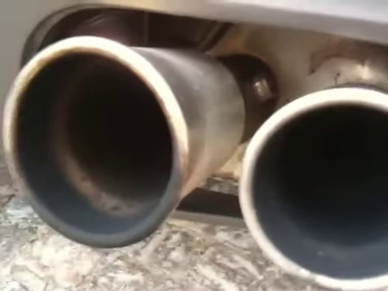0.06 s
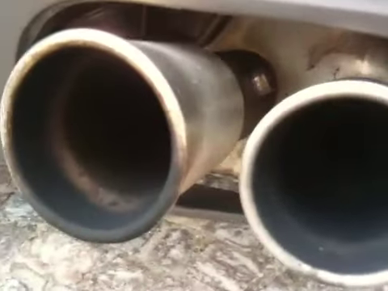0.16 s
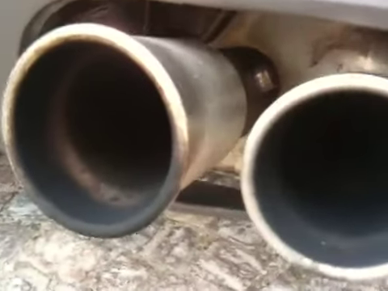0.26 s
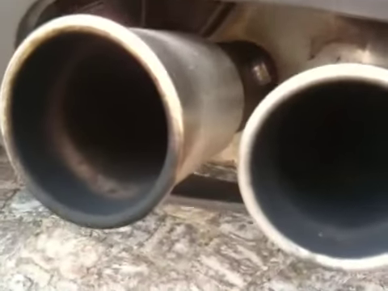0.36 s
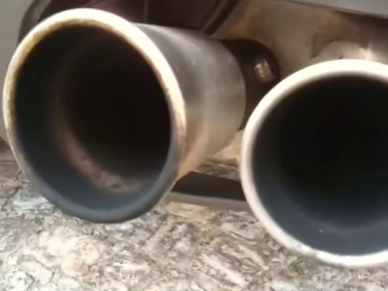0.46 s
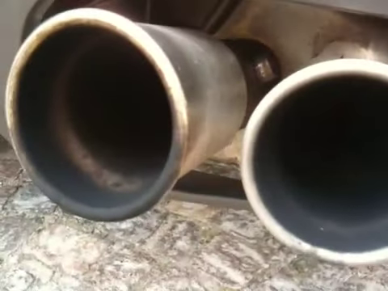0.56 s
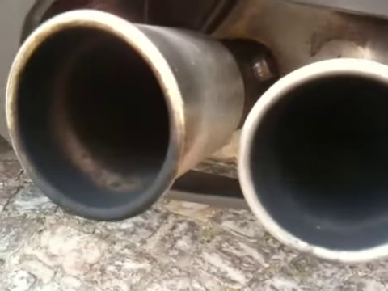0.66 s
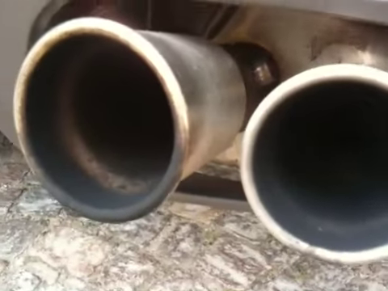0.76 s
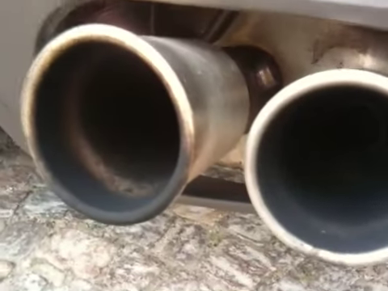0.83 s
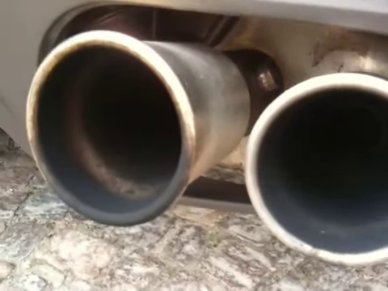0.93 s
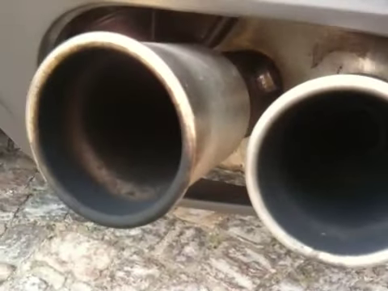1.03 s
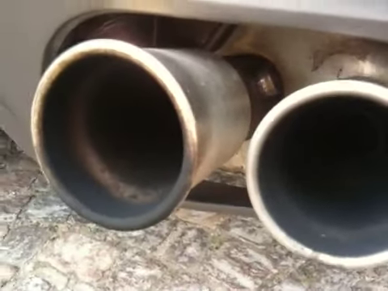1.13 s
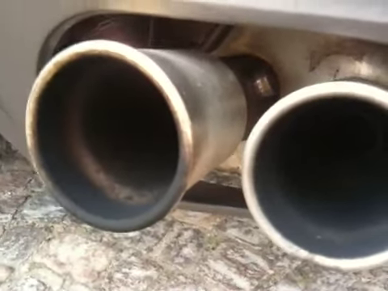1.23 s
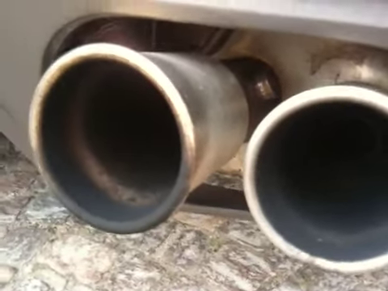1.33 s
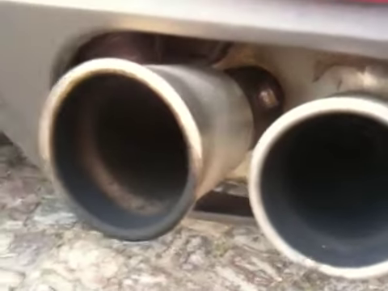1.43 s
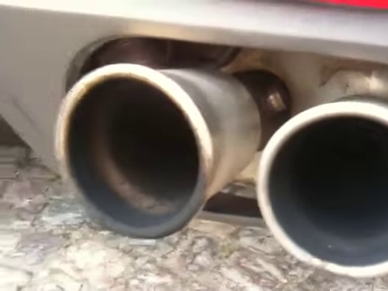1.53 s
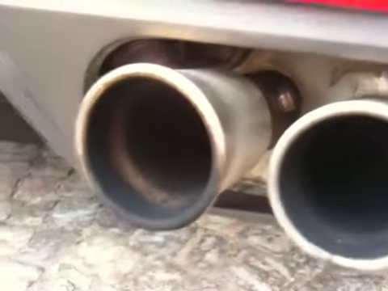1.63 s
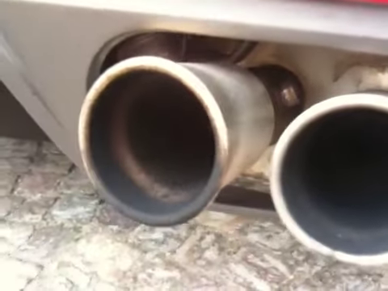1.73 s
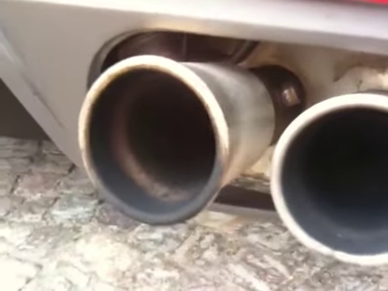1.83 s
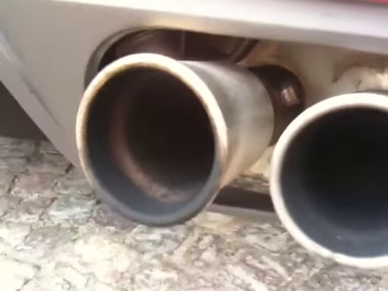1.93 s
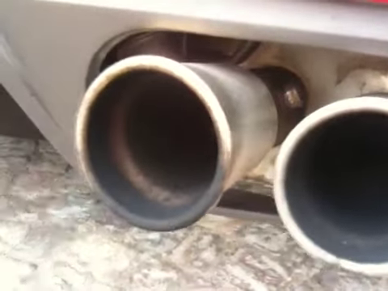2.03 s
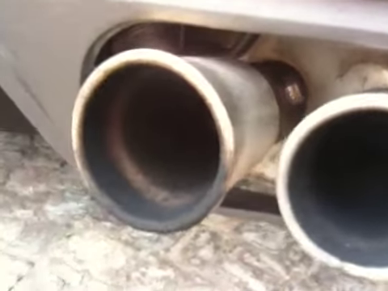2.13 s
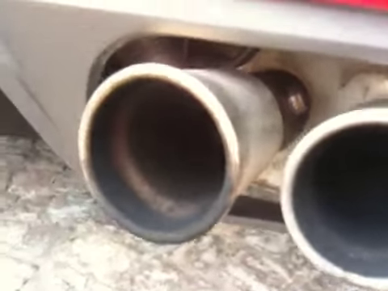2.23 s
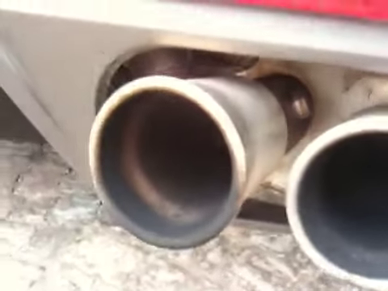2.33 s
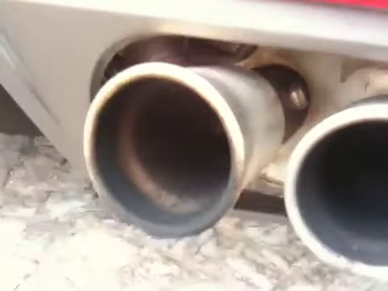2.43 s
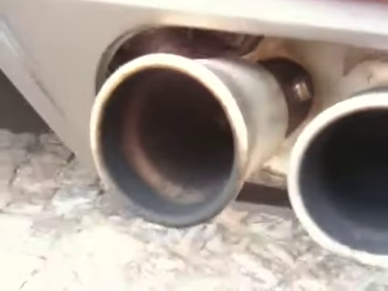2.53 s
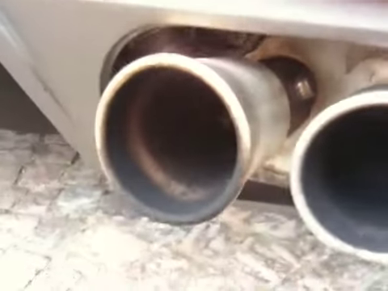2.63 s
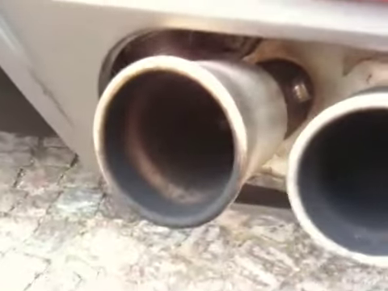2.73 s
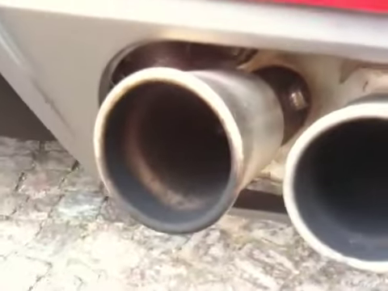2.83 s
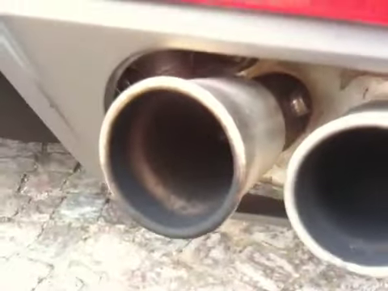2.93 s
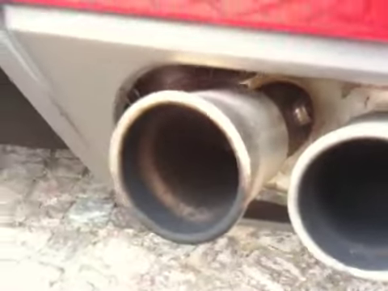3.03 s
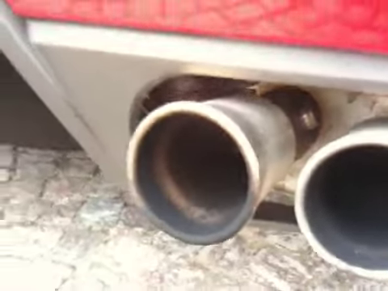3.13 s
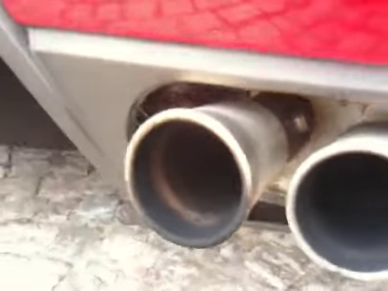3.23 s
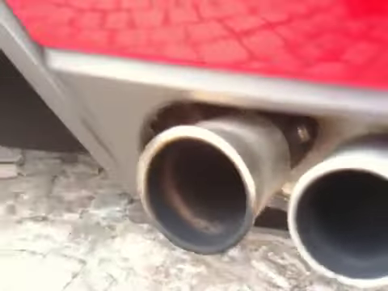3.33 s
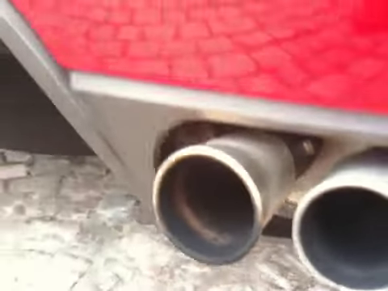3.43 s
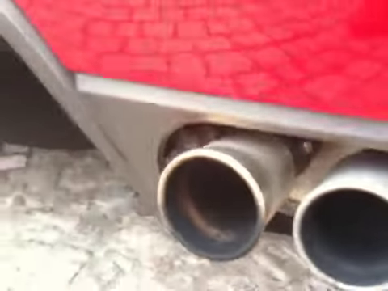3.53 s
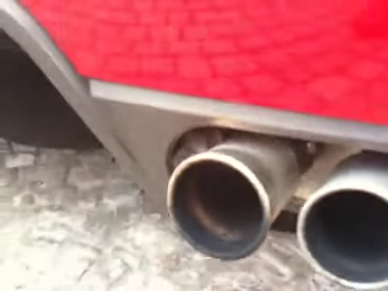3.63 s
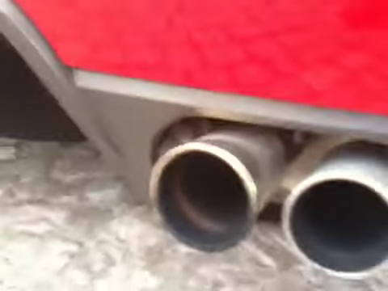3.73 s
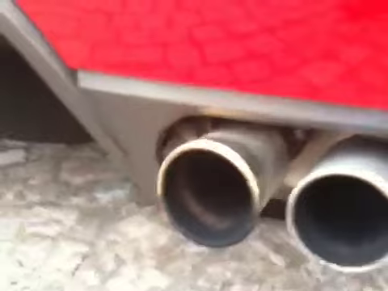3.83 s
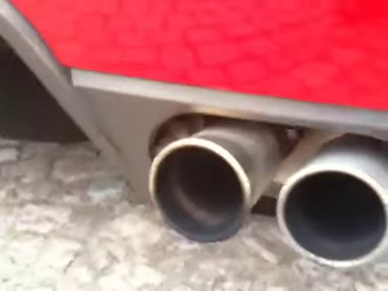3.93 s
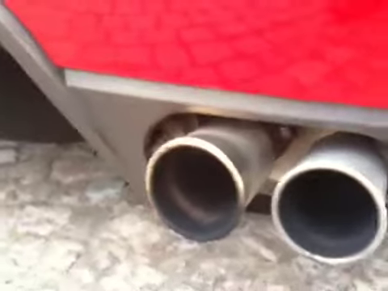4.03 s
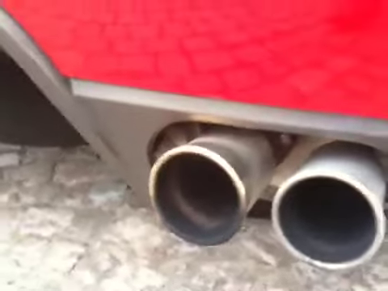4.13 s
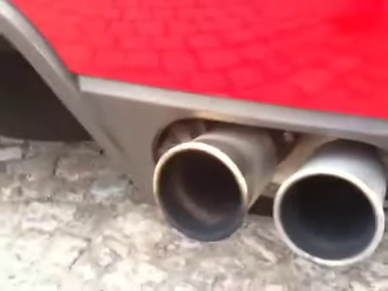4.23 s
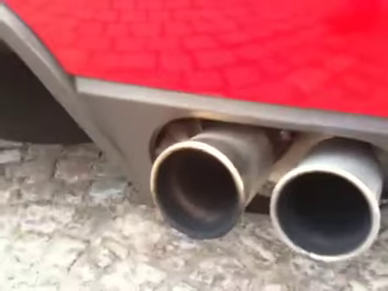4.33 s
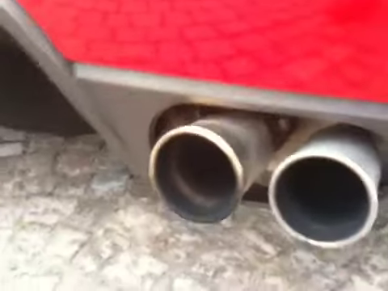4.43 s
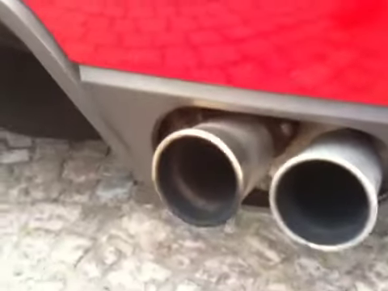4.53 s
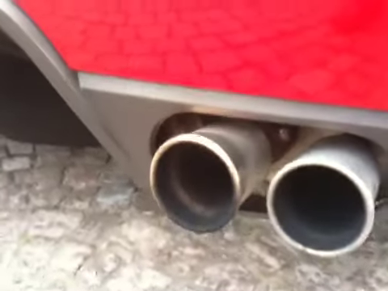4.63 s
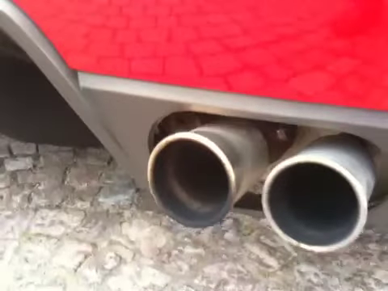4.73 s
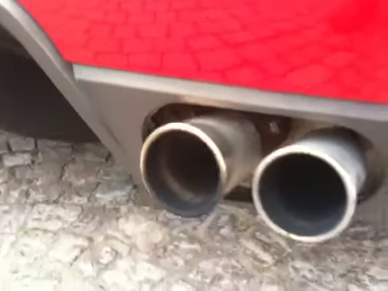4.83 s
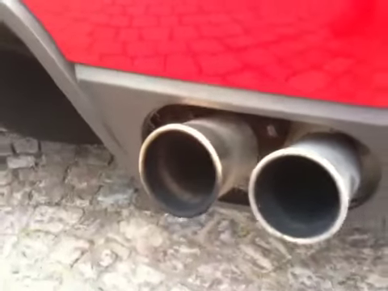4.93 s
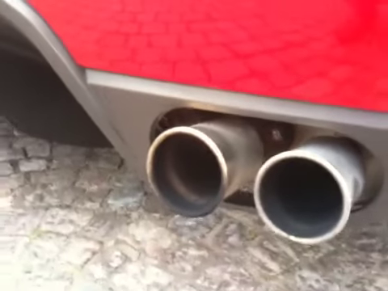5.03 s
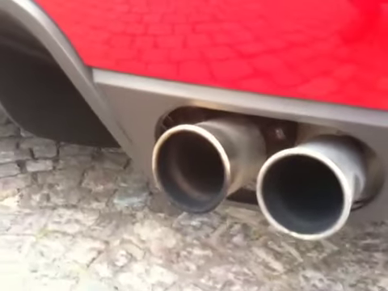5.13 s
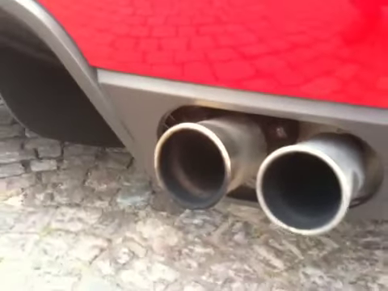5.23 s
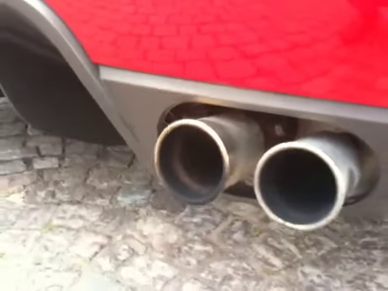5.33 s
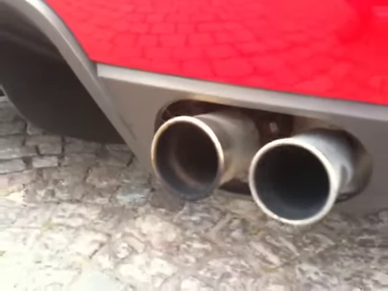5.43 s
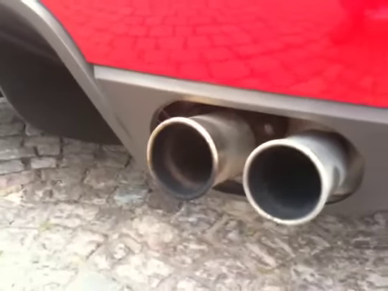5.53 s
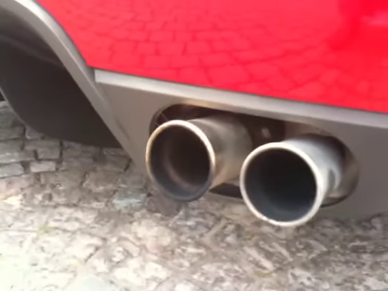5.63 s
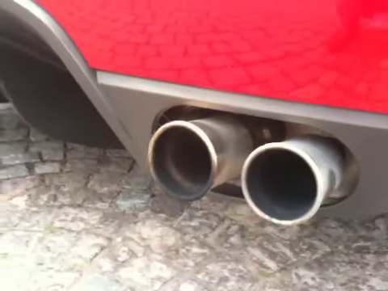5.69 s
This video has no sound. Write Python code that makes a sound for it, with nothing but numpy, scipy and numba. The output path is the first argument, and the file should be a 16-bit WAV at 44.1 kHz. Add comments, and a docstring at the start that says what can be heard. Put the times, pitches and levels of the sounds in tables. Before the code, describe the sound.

Nearly a second of very quiet outdoor wash, then a metallic clack and a pulsing electric gear whine with soft air puffs from the pipes. The exhaust suddenly erupts, holds a loud growl, drops into uneven thumps, then surges into a raspy, screaming blip before descending slowly with gurgling. One close microphone at the exhaust outlets outdoors; the sound is dry, compressed and slightly distorted.

```python
"""A paved street with low town noise, one microphone just behind the tailpipes of a V12 sports car.
The starter whines and whirrs, the engine catches, flares and sinks to a lumpy idle; one hard blip runs down
in a burble. Each firing rings the exhaust and pushes out turbulent gas, while single harmonics
howl as they sweep through its resonances. A limiter and an overloaded input flatten the loud parts."""
import sys
import numpy as np
from scipy import signal
from scipy.fft import rfft, irfft
from scipy.io import wavfile
from scipy.ndimage import uniform_filter1d
from numba import njit

SR = 44100
rng = np.random.default_rng(int(sys.argv[2]) if len(sys.argv) > 2 else 0)


def store_wav(level_fs):
    """Save 16-bit WAV to argv[1]."""
    pcm = np.round(np.clip(np.atleast_2d(level_fs), -1, 1) * 32767)
    wavfile.write(sys.argv[1], SR, pcm.T.astype(np.int16))


N = 254016
TIME = np.arange(N) / SR  # s
FREQS = np.maximum(np.arange(N + 1) * SR / (2 * N), 1)  # Hz, for a double-length spectrum

# Street: spectrum of the town noise [pitch_hz, level_db]
STREET_COLOUR = [(30, -52), (100, -11.5), (250, -2.5), (450, -7.5), (800, -7.5), (1900, -14.5), (2800, -26),
                 (6200, -35.5), (15000, -51)]
# Faint ticks in the street [start_s, level_db]
TICKS = [(0.5744, -50), (0.6094, -58), (0.6994, -62)]
# Town noise: level at the start, and its slope until the starter covers it
STREET_DB, STREET_DB_PER_S = -46.5, -7

# Starter: switched on, let go, and the decay of its whine
STARTER_ON_S, STARTER_OFF_S, STARTER_RELEASE_S = 0.9, 2.01, 0.027
# Rate at which its gear teeth mesh: at switch-on, at cranking speed, and the time constant between
MESH_START_HZ, MESH_HZ, SPIN_UP_S = 380, 1006, 0.27
WHINE_DB, WHINE_DB_PER_OCTAVE = -42, 24  # base level at cranking speed, slope with mesh rate
WHIRR_DB, WHIRR_ATTACK_S, WHIRR_RELEASE_S = -42, 0.016, 0.2  # the turning engine
# Partials of the gear whine [multiple_of_mesh_rate, level_db]
GEAR_PARTIALS = [(.27, -7), (1, .5), (2, 2), (3, -1.5), (4, -8)]
# Spectrum of the whirr [pitch_hz, level_db]
WHIRR_COLOUR = [(50, -54), (110, -13.5), (210, -10), (400, -17), (800, -4), (1200, -5.5), (2300, -9.5),
                (3200, -6.5), (5500, -13), (7000, -21), (10000, -24.5), (15000, -40)]
# The starter pinion snaps in [start_s, level_db, decay_s]
CLACKS = [(0.909, -33.5, 0.037), (0.932, -34.5, 0.029)]
# Spectrum of that snap [pitch_hz, level_db]
CLACK_COLOUR = [(47, -39), (80, -23), (229, 8.5), (613, -11), (684, -15), (797, 2), (930, -18), (1010, -12),
                (1470, 0), (2660, -8), (3780, -7), (8300, -10), (15000, -28)]
# Unfired air puffs and whistles out of the pipes [centre_s, pitch_hz, level_db]
AIR_PUFFS = [(1.085, 80, -52), (1.181, 1137, -36), (1.295, 100.5, -51), (1.458, 80, -51), (1.588, 105, -48),
             (1.745, 79.6, -52), (1.883, 106, -47), (2.041, 81, -51.5)]

# Engine speed, as firings of one six-cylinder bank [time_s, bank_hz]
SPEED = [(2.09, 25.11), (2.402, 65.65), (2.568, 65.43), (2.785, 58.6), (3.002, 41.9), (3.198, 29.66),
         (3.29, 29.18), (3.425, 44.35), (3.518, 63.58), (3.742, 150.2), (3.801, 163.6), (3.886, 165.4),
         (4.215, 152.5), (4.43, 140.3), (4.607, 127.0), (4.85, 104.9), (5.325, 73.85), (5.592, 50.35),
         (5.76, 37.68)]
# How hard the engine burns, about 0 throttle shut, 1 wide open [time_s, load]
LOAD = [(2.14, 0.79), (2.31, 0.95), (2.68, 0.89), (2.74, 0.7), (2.89, 0.7), (2.94, -0.068), (3.1, 0.56),
        (3.31, 0.13), (3.5, 0.9), (3.66, 0.81), (3.76, 1.21), (3.84, 0.93), (3.92, 0.51), (4.15, .25),
        (4.38, 0.44), (5.35, 0.35), (5.5, -0.23), (5.76, 0.13)]
# Unevenness of combustion at each engine speed [bank_hz, scatter_db]
SCATTER = [(30, 3), (65, 1.93), (118, 5.5), (134, 3.06)]
CATCH_S, CATCH_RISE_S = 2.102, 0.21  # the first burn, and how soon the exhaust builds up
CRUISE_HZ = 80  # bank rate to which the layer laws refer

# Exhaust resonances [pitch_hz, width_hz, level_db]
PIPE_RESONANCES = [(126.4, 13, 7), (186, 88, -1), (303, 135, 5.5), (428, 40, 8), (501, 10, 3.5),
                   (577, 23, -29), (880, 600, -16.5), (1100, 580, -8)]
# Spectra of the gas leaving the pipes [pitch_hz, level_db]
RASP_COLOUR = [(100, -68), (400, -44), (750, 8.5), (1150, 9.5), (1400, 4), (2100, -6.5), (3000, -12.5),
               (5000, -69)]
HISS_COLOUR = [(200, -72), (1200, 6.5), (2500, 1.5), (3900, -1), (5000, -6.5), (8000, -15.5), (15000, -27)]
FIZZ_HZ = 7900  # lower edge of the finest hiss, from the fastest gas
STIR_DB = 2.5  # boom and rasp gained per dB of scatter between firings
# Sharp pipe resonances where a passing harmonic howls [pitch_hz, width_hz, level_db, full_load_change_db]
HOWL_RESONANCES = [(116.7, 58, -23.5, 6), (155.6, 22, -26.5, 1), (221, 17, -47, 29), (259, 38, -35, 17),
                   (343, 53, -18, 1), (458.2, 51.4, -9.5, -4.5), (540.6, 64.4, -6.5, -5),
                   (597, 16, -32, -11), (722, 33, -19.5, -9), (859, 180, -28.5, 11.5)]
# Harmonics that feed the howls [multiple_of_bank_rate, level_db]
HARMONICS = [(1, -4.5), (2, -1), (3, 2.5), (4, 4), (5, -1.5), (6, 1), (7, -3), (8, -2), (9, -13.5),
             (11, -8), (12, -8.5), (13, -15), (14, -7)]
# A high resonance that one harmonic reaches at peak revs
SCREAM_HZ, SCREAM_WIDTH_HZ, SCREAM_ORDER = 1153.4, 104.5, 7
# Single hard firings [start_s, peak_db]
HARD_FIRINGS = [(2.098, -16.5), (2.135, -9), (2.164, -2), (2.202, 2.5), (2.931, -18), (3.033, -11),
                (3.096, -1), (3.13, -12), (3.187, -5), (3.223, -3), (3.255, -1.5), (5.498, -29),
                (5.513, 0.5), (5.547, -3), (5.585, -16), (5.596, -3.5)]

# How each layer grows with speed and load
# [unloaded_cruise_db, slope_db_per_octave, loss_db_per_squared_octave, full_load_db]
BOOM_LAW = (-9, -2, 2, 5.5)
DRONE_LAW = (-10, 5.5, 9.5, 0.5)
RASP_LAW = (-18.5, 2, 4.4, 16.5)
HISS_LAW = (-33.5, 12, -0.5, 14.5)
FIZZ_LAW = (-50, 19, 2, 19)
HOWL_LAW = (-1.5, 6.5, 2.1, 2)
SCREAM_LAW = (-19.5, 4.5, 9.4, 23)

LIMIT_DB, LIMIT_S = -2, 0.0064  # level at which the recorder turns itself down, and how fast
TOP_HZ = 15400


def undb(db):
    """Decibels to gain."""
    return 10 ** (np.asarray(db) / 20)


def curves(table):
    """Each column of a table, joined by straight lines in time."""
    s, *columns = np.transpose(table)
    return [np.interp(TIME, s, column) for column in columns]


def unit(x):
    """Scale to rms 1."""
    return x / np.sqrt(np.mean(x ** 2))


def even(x, size=3500):
    """Hold the running rms near 1 over a window in samples, keeping the fast beats."""
    smoothed = uniform_filter1d(uniform_filter1d(x ** 2, size), size // 2)
    floor = np.mean(x ** 2) / 10 ** 4  # keeps near-silence from being lifted
    return x / np.sqrt(np.maximum(smoothed, 0) + floor)


def colour(x, points):
    """Filter by a spectrum of (Hz, dB) points, joined on a logarithmic pitch scale."""
    hz, db = np.transpose(points)
    gain = undb(np.interp(np.log(FREQS), np.log(hz), db))
    return irfft(rfft(x, 2 * N) * gain)[:N]


def noise(points):
    """Coloured noise of rms 1."""
    return unit(colour(rng.standard_normal(N), points))


def walk(rate):
    """Smooth random drift with a spread near 1, given `rate` fresh values a second."""
    k = int(SR / rate)
    steps = np.repeat(rng.standard_normal(N // k + 1), k)
    return 1.3 * uniform_filter1d(uniform_filter1d(steps, k), k)[:N]


def fade(x, decay_s):
    """Give every pulse an exponential tail."""
    return signal.lfilter([1], [1, -np.exp(-1 / (SR * decay_s))], x)


def strikes(times, sizes):
    """Pulses at the given times, each shared between two samples."""
    out = np.zeros(N)
    place = np.clip(np.asarray(times) * SR, 0, N - 2)
    np.add.at(out, place.astype(int), sizes * (1 - place % 1))
    np.add.at(out, place.astype(int) + 1, sizes * (place % 1))
    return out


def gate(on_s, attack_s, off_s=np.inf, release_s=1):
    """Straight attack, hold and exponential release."""
    return np.clip((TIME - on_s) / attack_s, 0, 1) * np.exp(-np.maximum(TIME - off_s, 0) / release_s)


def resonance(hz, centre_hz, width_hz):
    """Gain of one resonance for a tone at hz."""
    return 1 / (1 + (2 * (hz - centre_hz) / width_hz) ** 2)


@njit
def highpass(x, edge_hz):
    """State-variable high-pass with a moving edge."""
    damping = 1.2
    out, band, low = np.empty(len(x)), 0., 0.
    for i in range(len(x)):
        g = np.tan(np.pi * edge_hz[i] / SR)
        v = (band + g * (x[i] - low)) / (1 + g * (g + damping))
        out[i] = x[i] - damping * v - low - g * v
        band, low = 2 * v - band, low + 2 * g * v
    return out


def street(tick_s=0.011):
    """A low, restless wash of town noise with a few faint ticks."""
    wash_db = STREET_DB + STREET_DB_PER_S * np.minimum(TIME, STARTER_ON_S)
    s, tick_db = np.transpose(TICKS)
    ticks = fade(strikes(s, undb(tick_db)), tick_s) * noise(HISS_COLOUR)
    return noise(STREET_COLOUR) * undb(wash_db + walk(27.3)) + ticks


def air_puffs(width_s=0.017):
    """Unfired air leaves the pipes in short, smoothly swelling tones."""
    air = np.zeros(N)
    for s, hz, db in AIR_PUFFS:
        swell = np.exp(-((TIME - s) / width_s) ** 2)
        air += undb(db) * swell * np.sin(2 * np.pi * hz * (TIME - s))
    return np.sqrt(2) * air


def pinion_clack():
    """The pinion snaps into mesh: short decaying bursts of metallic noise."""
    bursts = sum(fade(strikes([s], undb(db)), decay_s) for s, db, decay_s in CLACKS)
    return bursts * noise(CLACK_COLOUR)


def starter(throb_db=2.0, sag_share=0.038, jitter=0.015, rough_db=4.5):
    """Gears whine and the engine whirrs; every compression stroke drags the motor down, then lets it leap."""
    spin_up = np.exp(-np.maximum(TIME - STARTER_ON_S, 0) / SPIN_UP_S)
    mesh_hz = MESH_HZ - (MESH_HZ - MESH_START_HZ) * spin_up
    whine_db = WHINE_DB + WHINE_DB_PER_OCTAVE * np.log2(mesh_hz / MESH_HZ)
    stroke = 2 * np.pi * 13.8 * (TIME - 1.645)  # 13.8 compression strokes a second
    load_db = throb_db * np.cos(stroke)
    sag = sag_share * (np.sin(stroke) - np.sin(2 * stroke) / 3)
    phase = np.cumsum(mesh_hz * (1 - sag + jitter * walk(350))) / SR
    whine = sum(undb(db + rough_db * walk(90)) * np.sin(2 * np.pi * k * phase) for k, db in GEAR_PARTIALS)
    whine = whine * undb(whine_db + load_db)
    whine = whine * gate(STARTER_ON_S, WHIRR_ATTACK_S, STARTER_OFF_S, STARTER_RELEASE_S)
    whirr = noise(WHIRR_COLOUR) * undb(WHIRR_DB + 0.2 * load_db + 0.47 * walk(200))
    whirr = whirr * gate(STARTER_ON_S, WHIRR_ATTACK_S, STARTER_OFF_S, WHIRR_RELEASE_S)
    return whine + whirr + pinion_clack() + air_puffs()


def drive(law):
    """Gain of a layer from the engine's speed and load."""
    cruise_db, per_octave_db, bend_db, load_db = law
    octaves = np.log2(curves(SPEED)[0] / CRUISE_HZ)
    load = curves(LOAD)[0]
    return undb(cruise_db + per_octave_db * octaves - bend_db * octaves ** 2 + load_db * load)


def pipe(x, muffler_hz=950, mouth_hz=75):
    """Ring the exhaust; the silencer takes the treble and the open end radiates no deep bass."""
    response = 0
    for hz, width_hz, db in PIPE_RESONANCES:
        response = response + undb(db) / (1 + 1j * (FREQS ** 2 - hz ** 2) / (FREQS * width_hz))
    rung = irfft(rfft(x, 2 * N) * response)[:N]
    return signal.sosfilt(signal.butter(2, [mouth_hz, muffler_hz], "band", fs=SR, output="sos"), rung)


def chamber(x, hz=570, width_hz=190):
    """One steep resonance of the silencer."""
    edges_hz = [hz - width_hz / 2, hz + width_hz / 2]
    return signal.sosfilt(signal.butter(2, edges_hz, "band", fs=SR, output="sos"), x)


def pops(crack_db=-25, crack_s=0.0037, push_s=0.0012):
    """Hard single firings shove the pipe with a soft-edged push and spit."""
    s, db = np.transpose(HARD_FIRINGS)
    blows = strikes(s, undb(db))
    ring_peak = np.abs(pipe(fade(strikes([0], 1), push_s))).max()  # of one unit blow
    thump = pipe(fade(blows, push_s)) / ring_peak
    return thump + undb(crack_db) * fade(blows, crack_s) * noise(HISS_COLOUR)


def howls(phase, bank_hz, waver_db=1.35):
    """Harmonics swell and fade as the revs carry them through the pipe resonances; one screams at the top."""
    howl, load = np.zeros(N), curves(LOAD)[0]
    rings = [(hz, width_hz, undb(db + load_db * load)) for hz, width_hz, db, load_db in HOWL_RESONANCES]
    for order, order_db in HARMONICS:
        order = round(order)
        ring = sum(gain * resonance(order * bank_hz, hz, width_hz) for hz, width_hz, gain in rings)
        howl -= ring * undb(order_db + waver_db * walk(30)) * np.sin(2 * np.pi * order * phase)
    scream = resonance(SCREAM_ORDER * bank_hz, SCREAM_HZ, SCREAM_WIDTH_HZ)
    scream = scream * np.sin(2 * np.pi * SCREAM_ORDER * phase)
    return np.sqrt(2) * (howl * drive(HOWL_LAW) + scream * drive(SCREAM_LAW))


def firings(phase, scatter, bank_db=4, timing=0.0152):
    """Twelve cylinders fire in turn; the near bank is louder, and uneven burns vary in strength and moment."""
    count = np.arange(int(2 * phase[-1]))  # the two banks alternate
    times = np.interp(count / 2, phase, TIME)
    chance = rng.standard_normal((len(count), 2))  # moment, strength
    scatter_db = np.interp(times, TIME, scatter)
    cylinder_db = np.array([1, -2, 2, 0, -3, 1, 2, -1, 3, -2, -3, 0])[count % 12]
    # timing: share of a firing interval per dB of scatter
    times = np.interp(count / 2 + timing * scatter_db * chance[:, 0] / 2, phase, TIME)
    strength_db = cylinder_db - bank_db * (count % 2) + scatter_db * np.clip(chance[:, 1], -2, 2)
    return strikes(times, undb(strength_db))


def exhaust(phase, bank_hz, turbulence=0.18, puff_s=0.0039, rasp_click=0.19, jet=0.62, stream=0.9, edge=0.96):
    """Each firing sends a pressure pulse and a puff of turbulent gas down the pipes."""
    scatter_db = np.interp(bank_hz, *np.transpose(SCATTER))
    pulses = firings(phase, scatter_db)
    puffs = even(fade(pulses, puff_s))
    # gas keeps streaming between the puffs
    gas = (puffs + stream) * rng.standard_normal(N) / 2
    # uneven burns stir the gas
    stirred_gas = turbulence * undb(1.46 * (scatter_db - 4.5)) * gas
    # little sound lies below the firing rate
    boom = highpass(pipe(pulses + stirred_gas), edge * 2 * bank_hz)
    drone = chamber((puffs + stream) * rng.standard_normal(N))
    rasp = colour(rasp_click * pulses + gas, RASP_COLOUR)
    hiss = (puffs + jet) * noise(HISS_COLOUR)
    fizz = highpass((puffs + jet) * noise(HISS_COLOUR), np.full(N, float(FIZZ_HZ)))
    stir = undb(STIR_DB * (scatter_db - scatter_db.max()))
    lows = even(boom, size=1800) * stir * drive(BOOM_LAW) + even(drone, size=1200) * drive(DRONE_LAW)
    highs = even(rasp) * stir * drive(RASP_LAW) + even(hiss) * drive(HISS_LAW) + even(fizz) * drive(FIZZ_LAW)
    return lows + highs


def engine(flutter=0.00215):
    """The running engine, its speed never quite steady: exhaust, howling harmonics and hard firings."""
    bank_hz, = curves(SPEED)
    phase = np.cumsum(bank_hz * (1 + flutter * walk(25))) / SR  # in firings of one bank
    running = exhaust(phase, bank_hz) + howls(phase, bank_hz)
    return gate(CATCH_S, CATCH_RISE_S) * running + pops()


def scene():
    """Street, starter and engine reach one microphone, the same in both channels."""
    return np.tile(street() + starter() + engine(), (2, 1))


def record(dry):
    """A limiter holds the level and the input flattens the peaks; the deepest bass and the top are cut."""
    power = fade(dry ** 2, LIMIT_S) / (LIMIT_S * SR)
    held = dry / (1 + (power / undb(LIMIT_DB) ** 2) ** 2) ** 0.25
    ceiling, knee = 0.72, 6  # peak level, hardness of the flattening
    clipped = held / (1 + np.abs(held / ceiling) ** knee) ** (1 / knee)
    clipped = signal.sosfilt(signal.butter(1, 25, "high", fs=SR, output="sos"), clipped)
    return signal.sosfilt(signal.ellip(10, 0.1, 80, TOP_HZ, fs=SR, output="sos"), clipped)


dry = scene()
out = record(dry)
store_wav(out)
```